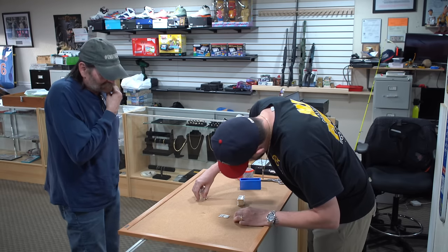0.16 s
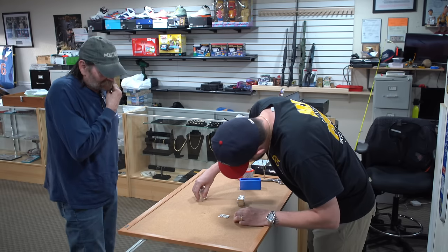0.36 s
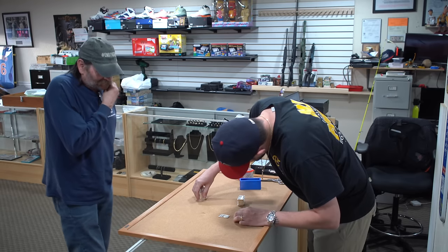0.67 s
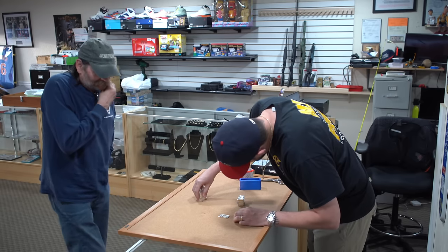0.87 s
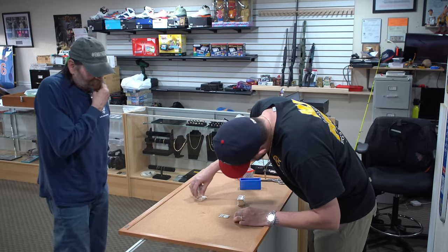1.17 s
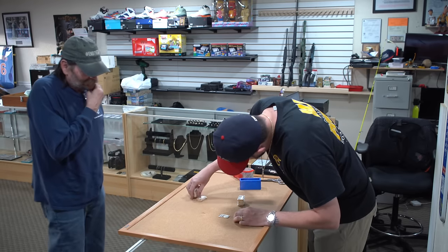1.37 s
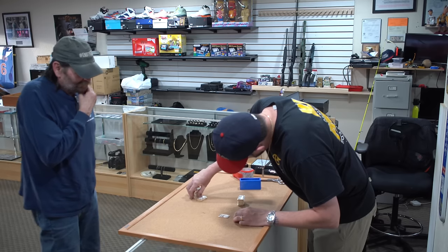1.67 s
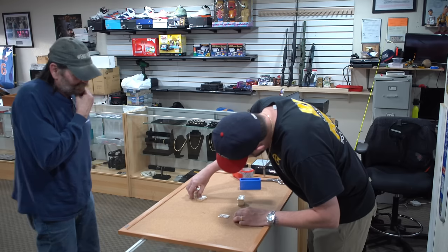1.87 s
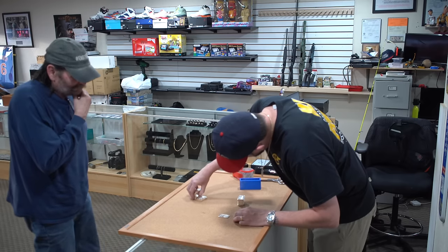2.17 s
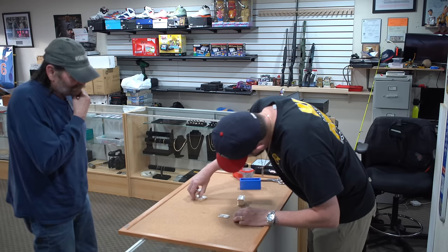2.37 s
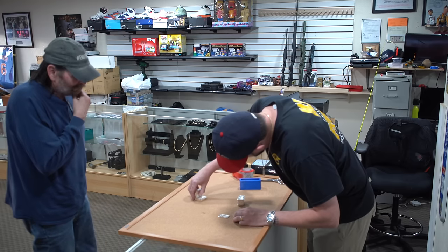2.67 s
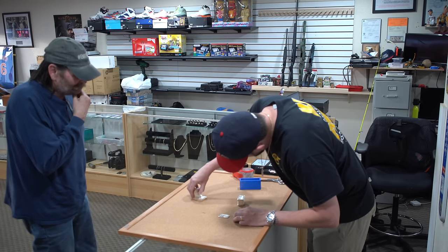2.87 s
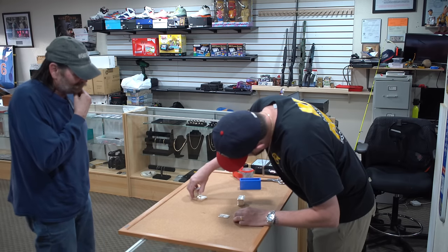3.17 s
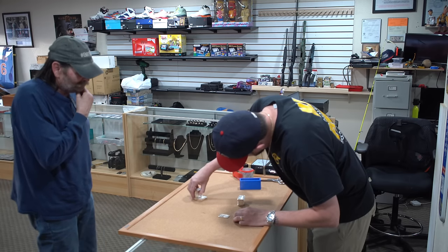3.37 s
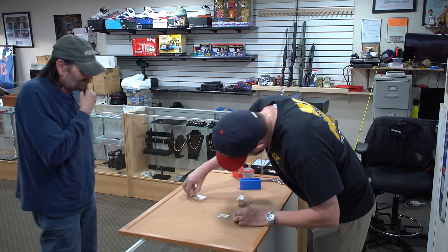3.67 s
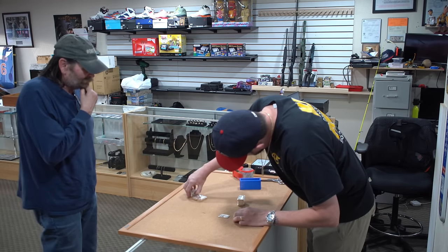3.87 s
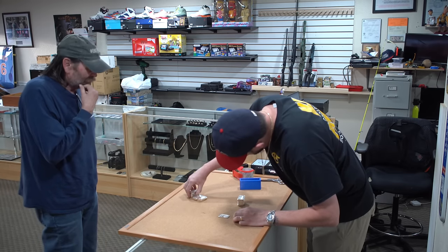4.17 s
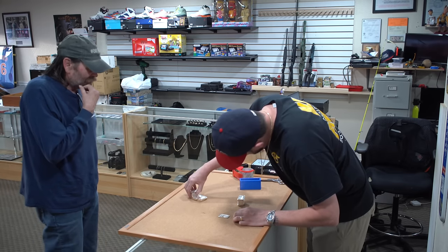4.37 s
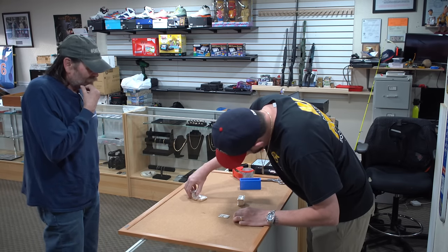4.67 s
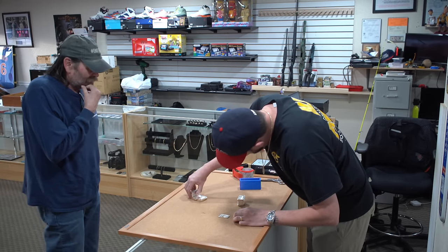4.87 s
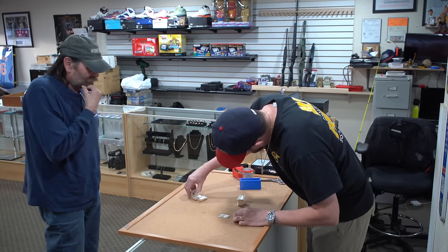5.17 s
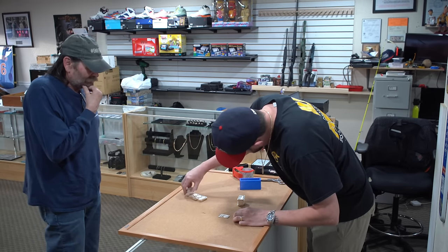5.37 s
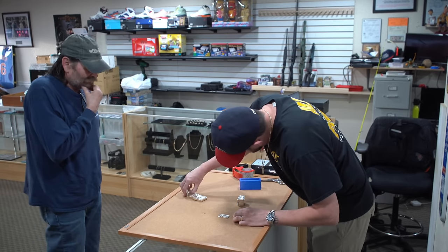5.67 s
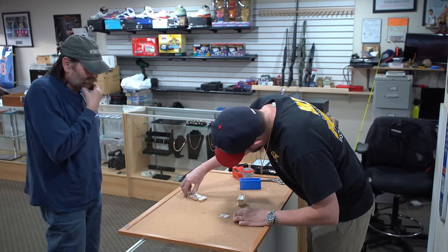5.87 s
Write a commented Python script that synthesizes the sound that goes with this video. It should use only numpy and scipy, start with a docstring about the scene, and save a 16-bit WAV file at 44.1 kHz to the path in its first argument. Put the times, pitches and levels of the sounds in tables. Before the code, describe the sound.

Metal coins clink and clatter in uneven bursts as they are counted onto a wooden counter, with light scrapes and a faint ventilation hum.

```python
"""Coins are counted onto a stack on a wooden shop counter, close to the microphone.
Each contact is a rattle of uneven edge impacts, heard as a crack, through damped coin modes and through the board.
Soft thuds of the hand join in, coins slide as grainy noise, one rings free in mid-air, and gliding sines squeak.
A small shop answers each contact with decaying noise; filtered noise and a tone make ventilation and hiss."""
import sys
import numpy as np
from scipy import signal
from scipy.fft import rfft, irfft, next_fast_len
from scipy.io import wavfile
from scipy.ndimage import uniform_filter1d, map_coordinates

SR = 44100
rng = np.random.default_rng(int(sys.argv[2]) if len(sys.argv) > 2 else 0)


def put_to_file(sound):
    """Save the sound as 16-bit audio at rate SR, in the file named by the first command-line argument."""
    columns = np.atleast_2d(sound).T  # one column per channel
    safe = np.clip(columns, -1, 1)
    whole_steps = np.round(safe * 32767)
    wavfile.write(sys.argv[1], SR, whole_steps.astype(np.int16))


N = 265041  # samples
LEAD = 0.015  # s of room before a landing


def amp(db):
    """Decibels to gain."""
    return 10 ** (np.asarray(db) / 20)


def unit(x):
    """Scaled to rms 1."""
    return x / np.sqrt(np.mean(x ** 2) + 1e-20)


def peaked(x):
    """Scaled to a peak of about 1, from its loudest 3 ms."""
    crest = 2.8  # peak over rms of a rattle
    loudest = np.sqrt(np.abs(uniform_filter1d(x ** 2, size=132)).max())
    return x / loudest / crest


def along(points, hz):
    """Reads a curve of (Hz, value) points on a log frequency axis."""
    f, v = np.transpose(points)
    return np.interp(np.log(hz + 1), np.log(f + 1), v)


def filtered(x, response):
    """x times a complex response of frequency."""
    m = next_fast_len(len(x) + 8192)
    spectrum = rfft(x, m) * response(np.fft.rfftfreq(m, 1 / SR))
    return irfft(spectrum, m)[:len(x)]


def resonance(f, hz, width_hz):
    """A causal resonant peak of gain 1."""
    return 1j * f * width_hz / (hz * hz - f * f + 1j * f * width_hz)


def wobble(rate):
    """A smooth random curve over the whole scene, rate knots a second."""
    knots = rng.standard_normal(int(N * rate / SR) + 4)
    return map_coordinates(knots, [np.arange(N) * rate / SR])


def fade(t, s, length):
    """Rises after the first time and falls before the last."""
    return np.clip(np.minimum(t - s[0], s[-1] - t) / length, 0, 1)


# Spectrum of the ventilation and hiss at the microphone. Each row: frequency in Hz, relative density in dB per Hz.
AIR = [(12, -21), (22, 5), (30, -4), (48, -9), (75, 0.5), (128, -3.5), (180, -5.5), (265, -7), (390, -13.5),
       (580, -9.5), (750, -15.5), (1080, -14.5), (1250, -20), (3200, -27.5), (15200, -32.5)]
# Unsteady fan tones. Each row: centre in Hz, width in Hz of the resonance (passed twice), rms level in dB.
FAN = [(64.7, 26, -60), (128.45, 5.4, -62), (235, 28, -67), (1035, 29, -77)]


def air():
    """Broad rush of air, narrow noise bands that waver as fan tones, and a drifting blade tone."""
    rush_db, blade_db, blade_hz = -52.5, -57.5, 270
    rush = unit(filtered(rng.standard_normal(N), lambda f: amp(along(AIR, f))))
    tones = np.zeros(N)
    for hz, width_hz, db in FAN:
        band = filtered(rng.standard_normal(N), lambda f: resonance(f, hz, width_hz) ** 2)
        tones += amp(db) * unit(band)
    blade_level = amp(blade_db + 1.8 * wobble(2.3))
    blade_phase = 2 * np.pi * np.cumsum(blade_hz + 1.4 * wobble(4.03)) / SR
    tones += blade_level * np.sin(blade_phase)
    return amp(rush_db + 0.3 * wobble(4.2)) * rush + tones


# Coins pushed over the board. Each row: start in seconds, length in seconds, level in dB before the slowing fade.
SLIDES = [(0.087, 0.16, -58), (1.05, 0.34, -65.5), (2.071, 0.29, -54), (3.22, 0.14, -57.5),
          (4.297, 0.17, -54), (4.75, 0.21, -68), (5.914, 0.11, -53)]
# Spectrum of the scrape. Each row: frequency in Hz, relative density in dB per Hz.
SCRAPE = [(350, -21), (700, 2), (1100, 2.5), (3700, -2.5), (7800, -4.5), (9200, -12), (16000, -28)]


def slides():
    """Grainy friction noise under each push, soft at both ends and fading as the push slows."""
    push_s, slowing_db = 0.036, 3
    t = np.arange(N) / SR
    level = np.zeros(N)
    for s, long, db in SLIDES:
        progress = np.clip((t - s) / long, 0, 1)
        level += fade(t, [s, s + long], push_s) * amp(db - slowing_db * progress)
    grains = amp(1.5 * wobble(180)) * rng.standard_normal(N)
    return level * unit(filtered(grains, lambda f: amp(along(SCRAPE, f))))


# The counter frame under the hand. Each row: mode in Hz, width in Hz, relative level in dB.
FRAME = [(74.6, 13, -5), (134, 26, -9.5), (199, 85, -5)]


def thud():
    """The hand's soft push, a smooth bump of force, excites the modes of the counter frame."""
    t = np.arange(SR // 4) / SR - LEAD
    palm = np.exp(-((t - 0.008) / 0.0031) ** 2)

    def frame(f):
        modes = sum(amp(db) * resonance(f, hz, width_hz) for hz, width_hz, db in FRAME)
        return resonance(f, 120, 140) * modes

    return peaked(filtered(palm, frame))


def edge_rattle(t, rise, t60, peak_db):
    """A burst of uneven impacts swells at the landing and dies away."""
    after = np.maximum(t, 0)
    swell = (1 - np.exp(-after / max(rise, 1 / SR))) ** 2 * amp(-60 * after / max(t60, 100 / SR))
    swell += amp(-26.5 - np.abs(t) * 4150)  # a faint short swell of noise on both sides of the landing
    impact_db = rng.normal(0, 2.06, len(t) // 30 + 1)
    uneven = amp(np.repeat(impact_db, 30)[:len(t)])  # impacts under a millisecond long
    return swell * uneven * rng.standard_normal(len(t))


def favour(hz, spot_hz, spread, lift_db):
    """The struck spot favours the modes nearest to spot_hz; spread is in log frequency."""
    return lift_db * np.exp(-(np.log(hz / spot_hz) / spread) ** 2)


# Ringing of the coins, lowest bending mode first.
# Each row: mode in Hz, relative level in dB, t60 in seconds before the grip scales it.
COIN = [(2502, 11.5, 0.025), (3946, -1, 0.013), (4890, -10.5, 0.02), (5510, -8.5, 0.035), (6573, -1, 0.045),
        (6694, -10, 0.057), (7020, -1, 0.015), (7515, -6, 0.016), (8170, -8, 0.036), (8880, -1.5, 0.044),
        (9340, 1, 0.042), (9600, -7.5, 0.054), (10030, 1.5, 0.04), (11140, 3, .025), (11600, -5.5, 0.018),
        (13430, 6, 0.041), (15900, 4, 0.025)]


def coin_modes(rattle, free_db, lead_hz, low_db, tilt):
    """The rattle rings the bending modes of the coins; gripped coins ring weaker and shorter."""
    spot_scatter_db = 3.5  # mode levels change with the struck spot
    hz, db, t60 = np.transpose(COIN)
    spot_db = favour(hz, lead_hz, 0.073, 11.2) + spot_scatter_db * rng.standard_normal(len(hz))
    gain = amp(db + free_db + spot_db) * tilt(hz)
    gain[0] = amp(db[0] + low_db)  # the lowest mode has its own level
    hz = hz * (1 + 0.005 * rng.standard_normal(len(hz)))  # worn coins differ a little in pitch
    width_hz = np.log(1000) / np.pi / (t60 * amp(0.17 * free_db))
    return filtered(rattle, lambda f: sum(g * resonance(f, c, w) for g, c, w in zip(gain, hz, width_hz)))


# The wooden counter board. Each row: mode in Hz, width in Hz, relative level in dB.
BOARD = [(336, 55, 3), (446.3, 28, 3.5), (573, 43, 3), (660, 37, 1.5), (803, 26, 2), (963, 55, 2),
         (1259, 119, 2.5), (1520, 170, -19), (1810, 72, 2.5)]


def board_knock(t, rattle, rise, board_hz):
    """The landing knocks the modes of the board, which alternate in sign."""
    # the wood feels mainly the first landing
    push = np.exp(-((t - 0.583 * rise) / 0.00017) ** 2) + 0.17 * rattle
    # each spot weighs the modes anew
    spot = amp(3.0 * rng.standard_normal(len(BOARD))) * (-1) ** np.arange(len(BOARD))

    def board(f):
        total = 0
        for g, (hz, width_hz, db) in zip(spot, BOARD):
            total = total + g * amp(db + favour(hz, board_hz, 0.2, 8.9)) * resonance(f, hz, width_hz)
        return total

    return filtered(push, board)


# Spectrum of the direct impact noise. Each row: frequency in Hz, relative density in dB per Hz before the tilt.
EDGE = [(700, 3), (1200, 1), (1700, 2.5), (2500, 5), (3500, 6), (5300, -0.5), (7300, -5.5), (9000, 1.5),
        (11000, 1.5), (15400, -5.5), (16500, -8)]


def clink(peak_db, t60, free_db, lead_hz, low_db, knock_db, board_hz):
    """A rattle of uneven impacts, heard directly, through the coin modes and through the board."""
    t = np.arange(SR // 4) / SR - LEAD
    # 1.705 ms suits a hard rattle with a t60 of 39 ms; longer and softer ones set in more slowly
    rise = 0.001705 * (t60 / 0.039) ** 0.53 * amp(-0.12 * peak_db)
    rattle = edge_rattle(t, rise, t60, peak_db)
    # low mids grow with a flat landing and shrink when the coin rings free
    dull_db = -8.5 + 0.31 * knock_db - 0.25 * free_db
    bright_db = rng.normal(-10 + 0.12 * peak_db, 0.5)  # harder contacts are brighter

    def tilt(f):
        return amp(along([(3500, dull_db), (5500, 0.005), (8000, 0.024), (11000, bright_db)], f))

    crack = filtered(rattle, lambda f: amp(along(EDGE, f)) * tilt(f))
    modes = coin_modes(rattle, free_db, lead_hz, low_db, tilt)
    # touching neighbours break up the ring
    chatter_db = np.interp(t, t[::70], rng.normal(0, 5, len(t[::70])))
    metal = crack + amp(9.0 + chatter_db) * modes
    wood = board_knock(t, rattle, rise, board_hz)
    return amp(peak_db) * (peaked(metal) + amp(knock_db) * peaked(wood))


# Decay of the small shop around the counter. Each row: frequency in Hz, t60 in seconds.
SHOP = [(100, 0.38), (500, 0.44), (2500, 0.17), (8000, 0.19), (16000, 0.19)]


def shop_tail():
    """Noise in which each frequency dies at its own speed, 6.5 ms late; energy 1."""
    hz, t, z = signal.stft(rng.standard_normal(SR // 3), SR, nperseg=256)
    decay = amp(-60 * t / along(SHOP, hz)[:, None])
    tail = signal.istft(z * decay, SR, nperseg=256)[1]
    return np.pad(tail / np.linalg.norm(tail), (round(0.0065 * SR), 0))


# Coin contacts. Each row: landing in seconds, approximate metal peak in dB, rattle t60 in seconds,
# free ringing in dB (relative), leading coin mode in Hz, lowest coin mode in dB (relative),
# board knock in dB against the metal, leading board mode in Hz.
CLINKS = [(0.3944, -21, .03, -7, 4260, 1, -7, 340), (0.3953, -0.5, 0.021, -13.5, 6200, -11, -16, 575),
          (0.581, -48, 0.016, -18, 3800, -5, -14.5, 340), (0.6988, -46, 0.035, -8, 5400, -7, -5, 437),
          (0.7201, -27.5, .053, -11, 4100, -8, -4.5, 403), (0.7687, -47, 0.042, 0, 7440, -20, -16, 340),
          (0.9112, -7, 0.033, -12, 7040, -19, -12, 343), (1.077, -48.5, .032, -9, 6420, -18, -18, 479),
          (1.1269, -35.5, .017, -4, 4040, -5, -3, 328), (1.183, -38.5, 0.024, -9, 7060, -33, -31, 340),
          (1.4312, -20, 0.12, -6, 4800, -34, -25, 340), (1.438, -13, .045, -4, 7100, -39, -30, 352),
          (1.4658, -1.5, 0.037, -12, 8030, -28, -27, 450), (1.5327, -18.5, 0.065, -12, 7300, -53, -32, 383),
          (1.67, -20, 0.092, -10, 6100, -46, -20, 910), (1.688, -4.5, 0.065, -13.5, 8650, -23, -10, 603),
          (1.7054, -6, 0.054, 27, 6750, -31, -10, 320), (1.7283, -5.5, 0.066, 20, 7200, -44, -40, 643),
          (1.7446, -12, .03, 5, 7550, -39, -33, 576), (1.8332, -35.5, .021, -6, 8870, -16, 3.5, 455),
          (1.8788, -43.5, 0.048, -8, 3940, -15, -6, 476), (1.9207, -45, 0.052, -10, 6950, -22, -15, 345),
          (1.9752, -33.5, 0.035, -10, 7030, -43, -20, 336), (2.2396, -30, 0.049, -12, 3850, -11, -14, 340),
          (2.3315, -38, .048, -7, 6590, -1, -16, 337), (2.3505, -39, 0.03, -13, 7000, -11, -6, 340),
          (2.433, -49.5, .028, -8, 7020, -25, -18, 343), (2.4745, -47.5, 0.068, -11, 6300, -4, 2, 330),
          (2.5081, -35, 0.012, -9, 3970, 4, -8, 471), (2.6392, -18.5, 0.026, -7, 3950, -41, -15, 571),
          (2.6627, -25, 0.068, -23, 4950, -14, -1.5, 345), (2.7206, -29, 0.047, -20, 3820, -17, -6.5, 1030),
          (2.7745, -39.5, 0.028, -8, 9250, -1, -3, 340), (2.804, -45, .03, -6, 5530, -2, 3, 579),
          (2.849, -48, 0.048, -4, 6640, -5, -11, 573), (2.9471, -13, 0.046, 0, 7100, -21, -19.5, 340),
          (2.9547, -4.5, 0.067, 0.5, 7400, -15, -12.5, 520), (3.241, -43, 0.041, -3.5, 6860, -12, -6, 340),
          (3.2517, -32.5, .089, -8, 7250, -4.5, -5.5, 326),
          (3.2783, -32.5, 0.02, -11, 9400, -12, -1.5, 380), (3.3285, -37.5, 0.044, -9, 4100, -6, -5, 340),
          (3.4013, -36.5, 0.029, -14.5, 6900, -11, -1.5, 370),
          (3.675, -48.5, 0.034, 0.5, 6670, -27, -21, 454), (3.6886, -31, 0.02, 0, 6970, -38, -47, 340),
          (3.707, -37, .047, -3, 6800, -32, -27, 340), (3.734, -33.5, 0.016, -10, 8700, -40, -29, 557),
          (3.7857, -44, 0.093, 0, 8030, -19, -6, 330), (3.8128, -16.5, 0.039, 3, 8000, -24, -0.8, 540),
          (3.822, -7, 0.041, -7.5, 8480, -14, -12.5, 440), (3.848, -14.5, 0.032, -9, 6900, -40, -29, 579),
          (3.902, -6.5, 0.029, -8, 3600, -22.5, -1.5, 485), (3.974, -28, 0.042, -14, 7000, -25, -8, 340),
          (3.982, -22, 0.044, -6.5, 3800, -13, -0.5, 970), (4.0745, -39, 0.032, -12, 3900, -25, 5.5, 1210),
          (4.0798, -19.5, 0.019, -5, 5260, -8.5, -2.5, 520), (4.1094, -41, 0.016, -6, 6500, -30, 12, 700),
          (4.177, -38.5, 0.055, -11, 7400, -19, 0, 480), (4.24, -37.5, 0.019, -6, 6200, -28, -2, 340),
          (4.336, -41.5, .028, -9, 3930, -23, -3, 460), (4.365, -19, 0.023, -3, 7300, -18, -22, 573),
          (4.3794, -35, 0.025, -5, 8800, -21, -4.5, 560), (4.4017, -37.5, 0.042, -5, 6660, -6, 0, 660),
          (4.434, -40.5, 0.032, -5, 6650, -3, -1, 480), (4.6104, -41.5, 0.052, -6, 4890, -10, -11, 338),
          (4.6204, -31.5, 0.022, -10.5, 6970, -7, -10, 340),
          (4.7124, -32.5, 0.039, -12, 3650, -22, -7, 1170), (4.7502, -37.5, 0.017, -8, 3900, -13, 4, 434),
          (4.83, -31.5, 0.02, -18, 6520, -5, -8, 1290), (4.8495, -20, 0.025, -13, 7140, -13, -15.5, 340),
          (4.9521, -48, .03, -2, 3950, -24, 5, 1200), (5.006, -20, 0.02, 1, 3980, -45, -4, 980),
          (5.25, -27.5, 0.027, -8.5, 3860, -23, -2.5, 444), (5.491, -49, 0.035, -9.5, 6500, -31, -23, 340),
          (5.512, -47.5, 0.036, -11, 5370, -35, -19.5, 339), (5.5269, -23.5, 0.075, 1, 8000, -13, 10, 440),
          (5.5408, -13, 0.14, -13, 7550, -33, -14, 333), (5.5479, -1.5, 0.052, 1, 7250, -13, -10, 970),
          (5.5572, -5.5, 0.023, 9, 8170, -35, -4, 1320), (5.586, -3.5, 0.034, 3, 7730, -11, -3, 975),
          (5.5982, -11, 0.053, -6, 7500, -17.5, -7.5, 342), (5.643, -14, 0.027, -3, 3760, -28, -10.5, 340),
          (5.949, -36.5, 0.086, -11.5, 3770, -18, 1, 990), (5.9775, -25, 0.015, -3, 6740, -12, -16, 340)]
# The hand landing on the counter. Each row: landing in seconds, approximate peak in dB.
THUDS = [(0.391, -50), (0.9096, -28), (1.672, -37), (1.7291, -24), (3.821, -32), (3.902, -52),
         (3.9795, -41), (5.6, -41), (5.64, -30)]


def coins():
    """Every contact of coin or hand, each with its own answer of the room."""
    shop_db = -8.5
    out = np.zeros(N + SR)
    sounds = [(s, clink(*kind)) for s, *kind in CLINKS]
    sounds += [(s, amp(db) * thud()) for s, db in THUDS]
    for s, direct in sounds:
        answer = amp(shop_db) * signal.fftconvolve(direct, shop_tail())
        start = round((s - LEAD) * SR)
        out[start:][:len(direct)] += direct
        out[start:][:len(answer)] += answer
    return out[:N]


# A falling coin grazed in mid-air. Each row: start in seconds, reference level in dB.
PING = [(1.635, -41)]
# Its free ringing. Each row: mode in Hz, level in dB against the reference, t60 in seconds.
FREE = [(3900, -24, 0.3), (8100, -16, 0.12), (12510, -12, .15), (14550, 1.5, 0.11)]


def ping():
    """Modes of a coin that nothing damps until it lands; they flutter as it tumbles."""
    flight_s = 0.039
    out = np.zeros(N)
    t = np.arange(round(flight_s * SR)) / SR
    for s, db in PING:
        ring = np.zeros(len(t))
        for hz, level_db, t60 in FREE:
            flutter_db = 1.4 * wobble(150)[:len(t)]
            ring += amp(db + level_db - 60 * t / t60 + flutter_db) * np.sin(2 * np.pi * hz * t)
        out[round(s * SR):][:len(t)] += ring * fade(t, t, 0.002)
    return out


# Thin gliding squeaks, perhaps of rubbing.
# Each row: start in seconds, length in seconds, first and last frequency in Hz, rms level in dB before wavering.
SQUEAKS = [(3.75, .05, 11950, 13050, -70), (4.141, 0.036, 13400, 12850, -66), (4.2, .06, 13000, 13600, -71),
           (4.195, .075, 14450, 14300, -72), (4.4, 0.18, 12520, 12200, -69),
           (4.586, .03, 12600, 12500, -75)]


def squeaks():
    """A gliding sine for each squeak, wavering in pitch and level."""
    t, out = np.arange(N) / SR, np.zeros(N)
    for s, long, first_hz, last_hz, db in SQUEAKS:
        span = [s, s + long]
        hz = np.interp(t, span, [first_hz, last_hz]) + 40 * wobble(120)
        phase = 2 * np.pi * np.cumsum(hz) / SR
        level = np.sqrt(2) * amp(db + 2.0 * wobble(60))
        out += fade(t, span, 0.013) * level * np.sin(phase)
    return out


def scene():
    """Coins, slides, squeaks and room air at one microphone close to the counter."""
    return (air() + slides() + coins() + ping() + squeaks())[None]


def record(dry):
    """The recorder cuts steeply above its band limit."""
    top_hz = 15900
    return filtered(dry[0], lambda f: 1 / (1 + (f / top_hz) ** 120))[None]


dry = scene()
out = record(dry)
put_to_file(out)
```